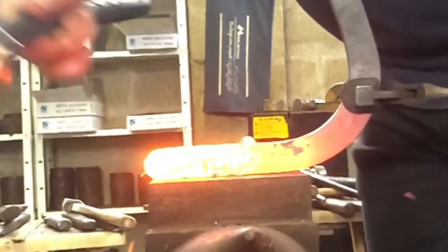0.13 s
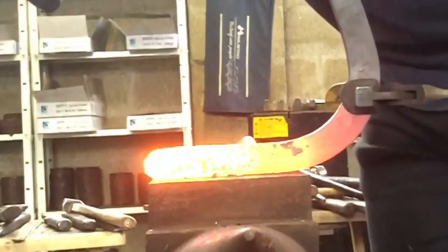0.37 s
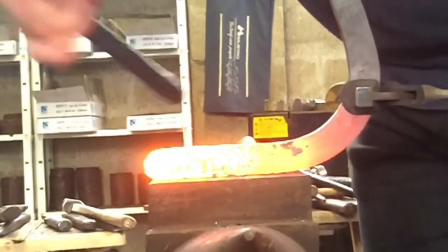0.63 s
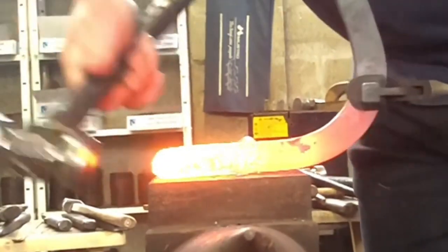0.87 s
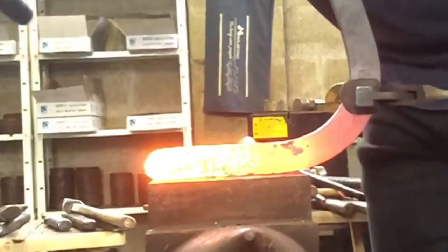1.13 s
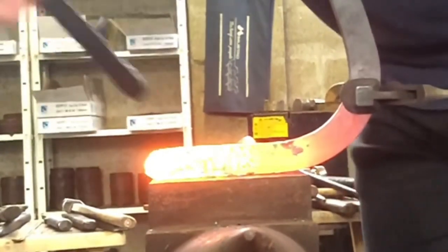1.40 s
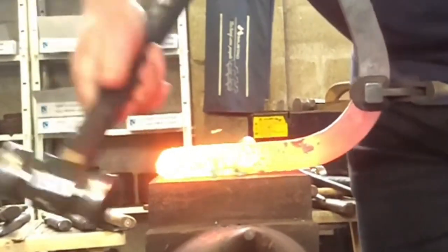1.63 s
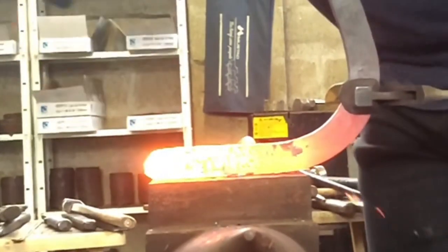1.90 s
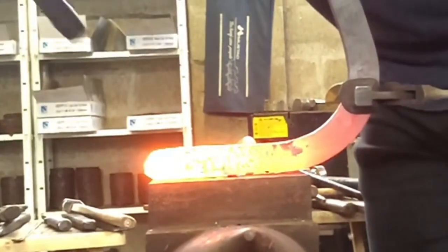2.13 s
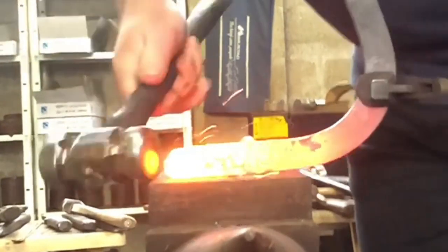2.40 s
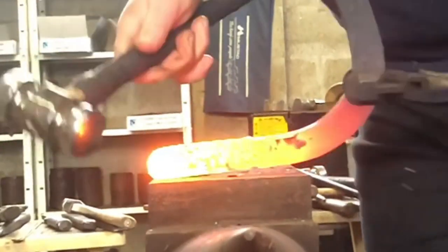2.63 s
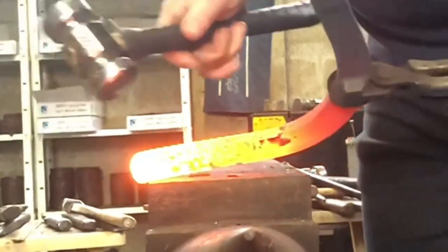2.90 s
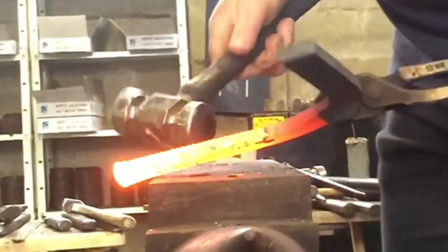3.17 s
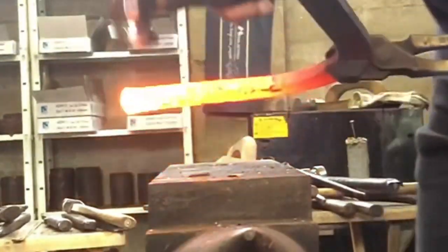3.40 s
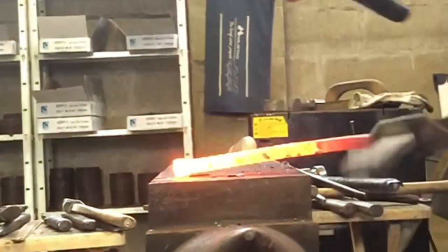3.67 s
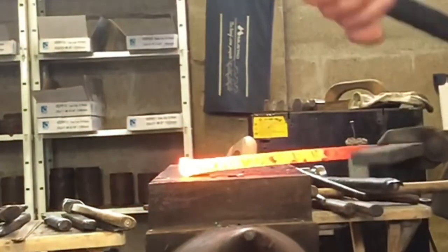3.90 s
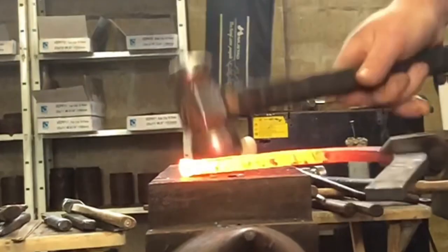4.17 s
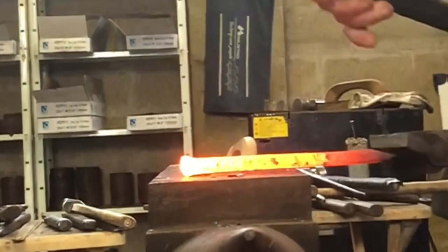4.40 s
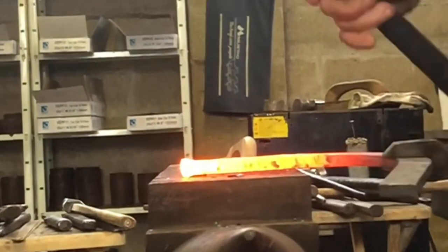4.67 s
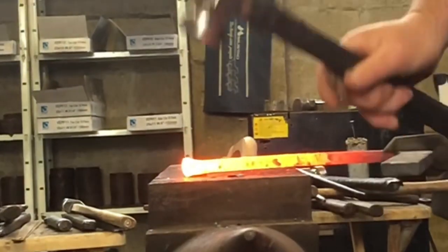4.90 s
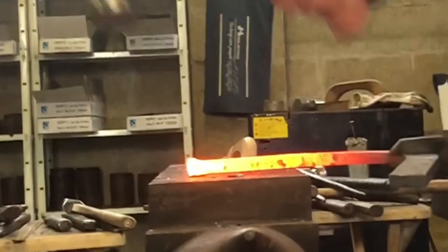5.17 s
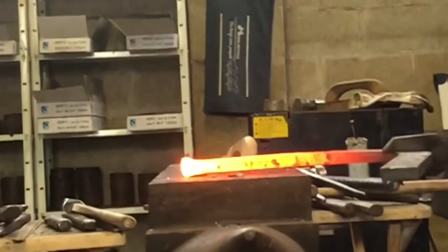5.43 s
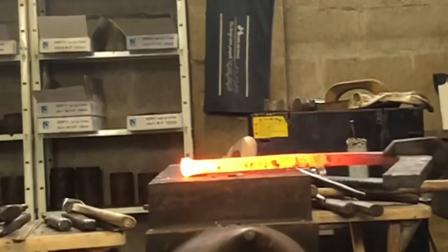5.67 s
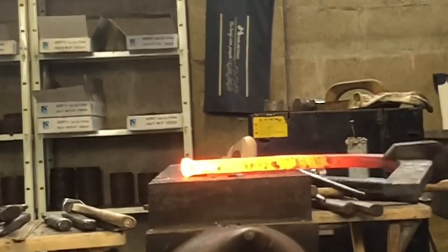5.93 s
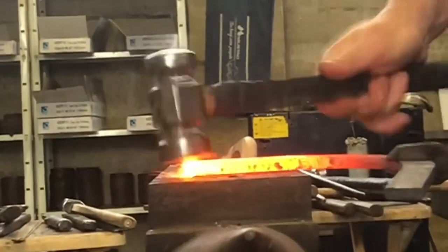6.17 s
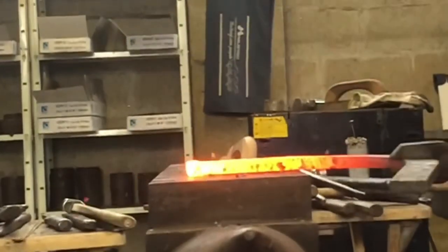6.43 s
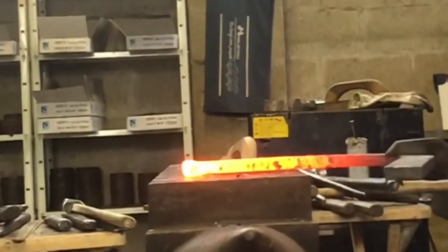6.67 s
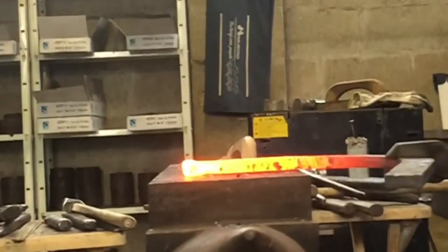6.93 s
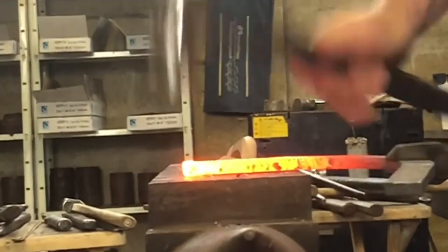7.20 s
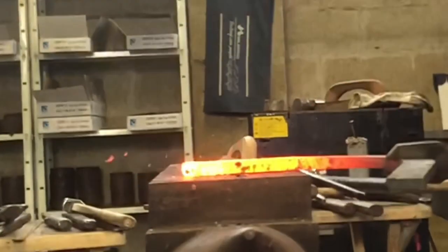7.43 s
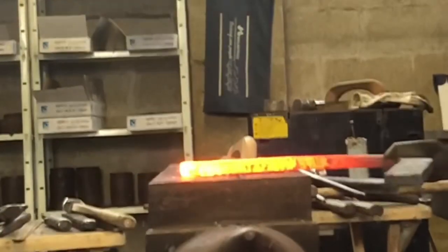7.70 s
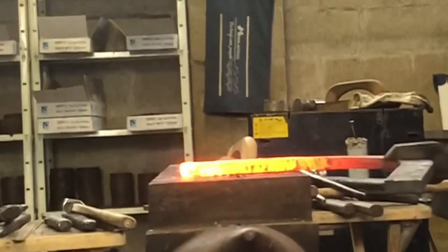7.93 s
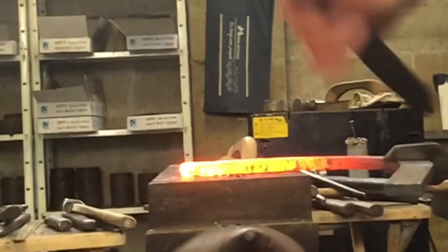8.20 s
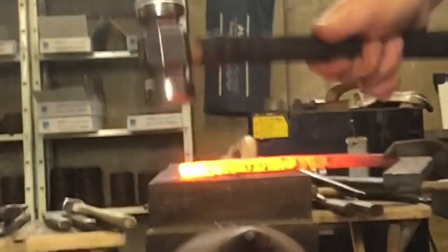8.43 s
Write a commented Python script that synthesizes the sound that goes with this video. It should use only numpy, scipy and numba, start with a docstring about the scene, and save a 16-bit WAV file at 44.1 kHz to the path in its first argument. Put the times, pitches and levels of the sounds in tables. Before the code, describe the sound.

Ten spaced hammer blows clang on glowing metal and an anvil, with a brief scrape between them, room echo and a steady forge rumble.

```python
"""A forge roars throughout as a hammer strikes a hot steel bar on an anvil, in a block-walled workshop.
Five sums of modes and resonant noise bands answer ten blows: crack, hammer, anvil, stand and room; four are end-on.
From 2.7 s bar and tongs slide as speed-driven friction noise; from 3.2 s the blows fall flat on the middle,
with a dry scuff at 3.75 s as the bar is laid down, and from 6.3 s they fall flat on the tip.
Flakes of scale and small clinks tick between blows as decaying noise; at each strong peak the level is limited."""
import sys
import numpy as np
from scipy import signal
from scipy.fft import rfft, irfft, next_fast_len
from scipy.io import wavfile
from scipy.ndimage import uniform_filter1d, minimum_filter1d
from numba import njit

SR = 44100
rng = np.random.default_rng(int(sys.argv[2]) if len(sys.argv) > 2 else 0)


def elevation(decibels):
    """Turn decibel levels (scalar or array-like) into linear amplitude ratios."""
    levels = np.asarray(decibels, float)
    return 10 ** (levels / 20)


def to_wav(sig):
    """Store sig (one row per channel, or 1-D mono) as 16-bit WAV at the path in sys.argv[1].

    Samples outside -1..1 are clipped; the rate is SR.
    """
    pcm = np.clip(np.atleast_2d(sig), -1, 1) * 32767
    pcm = np.round(pcm).astype(np.int16)
    wavfile.write(sys.argv[1], SR, pcm.T)  # frames by channels


N = 377937  # samples

# Levels and colours are relative; "end-on", "middle" and "tip" say where the bar is struck.
# Hammer blows: (time [s], crack [dB], ring [dB], room [dB], dullness [dB per octave])
BLOW_LIST = [(0.058, -8, -32.5, -29.5, -5.5), (.866, -5.5, -32.5, -29.5, 4.5),
             (1.6675, -9.5, -35, -27.5, 1), (2.4959, -10, -38.5, -28.5, -2.5),
             (3.2316, -13.5, -40.5, -35.5, 39), (4.3045, -3, -27, -28, 7.5),
             (5.158, -3, -23.5, -25.5, -1.7), (6.3035, -20, -40, -29, 17), (7.367, -3, -34, -26, 5),
             (8.4039, 3.5, -31.5, -24, 1)]
# Place struck by each blow: (0 end-on, 1 flat on the stiff middle, 2 flat on the soft hot tip)
STRUCK_PLACE = [0, 0, 0, 0, 1, 1, 1, 2, 2, 2]
# Clank of the contact: (frequency [Hz], width [Hz], end-on [dB], middle [dB], tip [dB])
CRACK_BANDS = [(294, 120, -21, -18.5, -18.5), (754, 800, -15.5, -9.5, -15), (1850, 1400, -14, 0, -5),
               (3350, 1500, 2, -11, 3), (4500, 4500, -14, -22, -2.5), (5900, 460, -5.5, -12, -8),
               (7820, 2000, -0.5, -7.5, -0.5)]
# Modes of the anvil: (frequency [Hz])
ANVIL_MODE_HZ = [1497, 2331, 2376, 2735, 3112, 3655, 4315, 4710, 5098, 5521, 5526, 6045, 6213, 6660, 6794,
                 7080, 7110, 7178, 7477, 7577, 7721, 7838, 8242, 8349, 8468, 8721, 8815, 8850]
# For each of them: (t60 [s], end-on [dB], middle [dB], tip [dB])
ANVIL_MODES = [(1.3, -31.5, -18.5, -15), (1.1, -26.5, -21.5, -15.5), (1.05, -4, -0.5, -1.5),
               (0.52, -9, -19.5, -9), (0.32, -9, -33.5, -7.5), (0.89, -12.5, -19.5, -15),
               (0.66, -9, -27, -12.5), (0.23, -27, -27, -23.5), (0.5, -14.5, -19, -12),
               (1.294, -27.5, -12, -16.5), (0.84, -17.5, -20.5, -29), (0.29, -12, -24, -27.5),
               (.6, -15.5, -21.5, -19.5), (0.3, -5, -34, -23), (0.74, -6, -33.5, -14.5),
               (0.36, -7.5, -26, -33), (0.61, -1, -26, -14.5), (0.41, -26.5, -20.5, -15),
               (0.43, -9.5, -34.5, -35), (0.29, 1, -11.5, -9), (0.3, -8, -36, -34), (0.54, -11, -22.5, -14),
               (0.29, -23.5, -6, -19.5), (0.43, -16, -25, -29.5), (.12, -10.5, -38.5, -36),
               (0.11, -4.5, -17, -28), (0.48, -20, -17.5, -9), (.45, -31, -20.5, -17.5)]
# Low modes of horn and stand: (frequency [Hz])
STAND_MODE_HZ = [41, 607.9, 688, 775]
# For each of them: (t60 [s], end-on [dB], middle [dB], tip [dB])
STAND_MODES = [(.4, -15.5, -16, -11.5), (1.2, -13.5, -11.5, -9.5), (0.45, -33, -18, -22),
               (0.96, -22, -17.5, -26.5)]
# Modes of the hammer head, soon damped by the hand: (frequency [Hz])
HAMMER_MODE_HZ = [800, 2095, 3053, 3620, 6213]
# For each of them: (t60 [s], end-on [dB], middle [dB], tip [dB])
HAMMER_MODES = [(0.066, -31, -12, -6), (0.062, -23, -8.5, -51), (0.19, -16.5, -12, -20),
                (.08, -24, -24, -18), (0.07, -23, -9.5, -11)]
# Dull thud of bar and block: (frequency [Hz], width [Hz], t60 [s], end-on [dB], middle [dB], tip [dB])
THUD_BANDS = [(75.4, 61, 0.34, -18.5, -26.5, -20.5), (285, 90, 1.15, -20, -24, -15.5),
              (730, 170, 1.64, -24, -17.5, -14), (1145, 600, 1.61, -18, -14.5, -19.5),
              (1850, 1300, 1.3, -29, -10.5, -21.5)]
# Colour of the room sound: (frequency [Hz], density [dB per Hz])
ROOM_COLOUR = [(60, -19.5), (150, -23.5), (280, -24.5), (450, -22.5), (730, -15), (1100, -23),
               (2500, -21.5), (4500, -25.5), (7500, -28.5), (9300, -31)]
# Decay of the room: (frequency [Hz], t60 [s])
ROOM_DECAY = [(60, 0.69), (250, 1.4), (1000, 1.15), (2500, 1.27), (5000, 0.71), (9000, 0.48)]
# Room level above 3.5 kHz: (end-on [dB], middle [dB], tip [dB])
ROOM_TREBLE = [1.5, -8, -0.5]
# Bar and tongs sliding over the anvil face: (start [s], length [s], fastest [dB], share until fastest [1])
SLIDE_LIST = [(2.719, 0.46, -49, 0.5), (3.188, 0.15, -46, 0.37), (3.7, 0.32, -51.5, 0.53),
              (3.846, 0.52, -39.5, 0.55)]
# Colour of the sliding: (frequency [Hz], level [dB])
SLIDE_COLOUR = [(200, -11.5), (450, -13.5), (750, 1), (1100, -7.5), (1950, 0), (3200, -6), (4300, -10.5),
                (4900, -19), (8300, -18), (9300, -27)]
# Colour of the bar being laid down: (frequency [Hz], level [dB])
SCUFF_COLOUR = [(200, -10), (600, -5), (1100, -8.5), (1850, 1.5), (2400, 3), (3100, 1), (4500, -7.5),
                (6500, -4.5), (9300, -13)]
# Flakes of scale and small clinks: (time [s], level [dB])
TICK_LIST = [(.535, -57), (0.675, -58), (1.59, -66.5), (3.074, -53), (5.625, -51.5), (5.969, -58.5),
             (6.867, -57.5), (6.96, -65.5), (7.972, -52.5), (8.24, -62)]
# Colour of the forge roar: (frequency [Hz], level [dB])
FORGE_COLOUR = [(20, -34), (30, -6), (80, 9.5), (150, -7), (300, -7.5), (450, -13), (760, -6), (1000, -16),
                (3000, -18.5), (4800, -26), (6000, -29.5), (9300, -34.5)]
# Blurred low tones of the forge: (frequency [Hz], width [Hz], level [dB])
FORGE_TONE_BANDS = [(81, 14, -68.5), (93.5, 15, -61.5), (125.2, 11, -68.5), (192, 13, -68),
                    (320.5, 9.8, -69), (489, 11, -72)]

CONTACT_S = 0.0077  # t60 of the build-up of a contact
CRACK_T60_S, CRACK_TILT = 0.063, 1.3  # at 2 kHz; how much more the crack follows the brightness
EARLY_DB, EARLY_T60_S = 1.5, 0.075  # heard before the walls answer
ECHO_S, SWELL_S = 0.022, 0.032  # delay of the walls' answer, t60 of its build-up
RING_SCATTER_DB, RING_WAVER_DB = -1.2, 1.77
RING_SWELL_S, RING_SWELL_SHARE = 0.26, 0.28  # build-up of narrow lines: at most, share of their t60
RING_EARLY_DB, RING_EARLY_T60_S = 0, 0.33  # the anvil heard directly; t60 at most
EARLY_DULLS = 0.1  # loss of direct ring [dB] for each unit of dullness
ROOM_DULLS = 0.016  # tilt of the room sound [dB per octave] for each unit of dullness
STAND_DB, STAND_FOLLOWS, USUAL_ROOM_DB = -29, 0.16, -25  # the stand follows the force only a little
HORN_HZ, HORN_T60_S, HORN_BLOOM_S, HORN_DB = 611, 1.246, 0.74, 7  # the level adds to the stand's
HORN_PHASE = 3.43  # radians at the blow; the note beats with the stand's neighbouring note
RATTLE_DB, RATTLE_T60_S = 3.5, 1.2
SPEED_POWER, GRIT_DB, SNAG_DB = 0.95, 1.5, 0.7  # level follows speed; fine grit, coarser snags
LAY_S, LAY_DB, LAY_RISE_S, LAY_T60_S = 3.7545, -14, 0.036, 0.06  # rise and decay as t60
LAY_TAIL_DB, LAY_TAIL_T60_S = -45, 0.63
TICK_T60_S, TICK_TAIL_DB, TICK_TAIL_T60_S = 0.039, -10.5, 0.24
FORGE_DB = -56
LIMIT_DB, HOLD_S, RELEASE_S = -13, 0.014, 0.0067
TOP_HZ = 9007


def blows():
    """Superposition: each impact excites contact, hammer, anvil, stand, horn and room together."""
    times, crack_db, ring_db, room_db, dullness = np.transpose(BLOW_LIST)
    stand_db = STAND_DB + STAND_FOLLOWS * (room_db - USUAL_ROOM_DB)
    bright = -ROOM_DULLS * dullness
    out = crack(times, crack_db, dullness, bright)
    out += hammer(times, crack_db, dullness)
    out += anvil(times, ring_db, dullness)
    out += rings(STAND_MODE_HZ, STAND_MODES, answered, times, stand_db)
    out += horn(times, stand_db)
    tail = thud(times, room_db) + room(times, room_db, bright)
    # loose tools and separate echoes make the start of the tail clumpy
    clumps = RATTLE_DB * walk(130) * decays(times, 0.92, RATTLE_T60_S).real
    return out + tail * elevation(clumps)


def crack(times, crack_db, dullness, bright):
    """Impact noise: a brief contact excites broad bands, and the higher ones decay sooner."""
    out = 0
    for hz, width, *place_db in CRACK_BANDS:
        tilt_db = CRACK_TILT * bright * np.log2(hz / 2000)
        loss_db = 0.13 * dullness * max(np.log2(hz / 3200), 0)
        size = elevation(crack_db + np.take(place_db, STRUCK_PLACE) + tilt_db - loss_db)
        # the crack rises over a few milliseconds, then falls
        rise = decays(times, size, CONTACT_S)
        fall = decays(times, size, CRACK_T60_S * (2000 / hz) ** 0.42)
        out += band(hz, width) * (fall - rise).real / 2
    return out


def hammer(times, crack_db, dullness):
    """Strong damping: the modes of the hammer head are heard at once and soon stopped by the hand."""
    return rings(HAMMER_MODE_HZ, HAMMER_MODES, swelled, times, crack_db, 3 * dullness) / 2


def anvil(times, ring_db, dullness):
    """Modal vibration: lines sound directly, then build up in the room, the narrow ones more slowly."""
    def bloom(times, sizes, t60, hz):
        """Resonant build-up: the swell takes a share of the decay time, up to a limit."""
        swell = min(RING_SWELL_S, t60 * RING_SWELL_SHARE)
        early_db = RING_EARLY_DB - EARLY_DULLS * dullness
        return answered(times, sizes, t60, hz, swell, early_db, min(RING_EARLY_T60_S, t60))

    return rings(ANVIL_MODE_HZ, ANVIL_MODES, bloom, times, ring_db, dullness)


def horn(times, stand_db):
    """Energy storage: the horn's note keeps feeding the room, so it blooms late and fades evenly."""
    size = elevation(stand_db + HORN_DB) * np.exp(1j * HORN_PHASE)
    return swelled(times, size, HORN_T60_S, HORN_HZ, HORN_BLOOM_S).imag


def thud(times, room_db):
    """Damped resonance: bar and block sound as low noise bands that swell with the room."""
    out = 0
    for hz, width, t60, *place_db in THUD_BANDS:
        size = elevation(room_db + np.take(place_db, STRUCK_PLACE))
        out += band(hz, width) * answered(times, size, t60).real * 2
    return out


def room(times, room_db, bright):
    """Reverberation: the diffuse field is a set of noise bands, each with its own decay time."""
    out = 0
    for hz in 60 * 2 ** np.arange(0, 7.3, 0.4):
        size = elevation(room_db + bright * np.log2(hz / 2000) + table(ROOM_COLOUR, hz))
        size *= np.sqrt(hz / 300)  # bands widen with frequency
        size *= elevation(np.take(ROOM_TREBLE, STRUCK_PLACE) * (hz > 3500))
        out += band(hz, hz / 3) * answered(times, size, table(ROOM_DECAY, hz)).real
    return out


def drag():
    """Friction: rough steel on steel gives a gritty hiss that follows the speed of each slide."""
    t, speed = np.arange(N) / SR, 0
    for start, length, db, fastest in SLIDE_LIST:
        # bend time so that the sine peaks at the fastest moment
        bend = np.log(0.5) / np.log(np.clip(fastest, 0.1, 0.9))
        along = np.clip((t - start) / length, 0, 1) ** bend
        speed = speed + elevation(db) * np.abs(np.sin(np.pi * along)) ** SPEED_POWER
    grit = elevation(GRIT_DB * walk(400) + SNAG_DB * walk(45))
    return noise(lambda f: elevation(table(SLIDE_COLOUR, f))) * grit * speed


def lay_down():
    """Friction and reverberation: a short scuff of steel on steel and its tail in the room."""
    times = np.array([LAY_S])
    scuff = elevation(LAY_DB) * swelled(times, 1, LAY_T60_S, rise=LAY_RISE_S)
    tail = decays(times, elevation(LAY_TAIL_DB), LAY_TAIL_T60_S)
    return noise(lambda f: elevation(table(SCUFF_COLOUR, f))) * (scuff + tail).real


def ticks():
    """Impulse response: brittle clicks excite two treble bands and leave a short tail."""
    times, db = np.transpose(TICK_LIST)
    colour = band(3300, 1800) + 0.84 * band(7200, 2500)
    click = decays(times, elevation(db), TICK_T60_S)
    tail = decays(times, elevation(db + TICK_TAIL_DB), TICK_TAIL_T60_S)
    return colour * (click + tail).real


def forge():
    """Filtered noise: a broad roar with blurred low tones and a faint, flickering treble hiss."""
    roar = noise(lambda f: elevation(table(FORGE_COLOUR, f))) * elevation(FORGE_DB + walk(3))
    hiss = band(12000, 5000) * elevation(-74 + 3 * walk(27))
    tones = sum(elevation(db) * band(hz, width) for hz, width, db in FORGE_TONE_BANDS)
    return roar + hiss + tones


def rings(hz_list, modes, shape, times, level_db, dullness=0):
    """Modal superposition: every blow excites all modes, neighbours in opposite phase; echoes flutter them."""
    scatter = rng.standard_normal((len(times), len(modes))).T
    waver = [elevation(RING_WAVER_DB * (walk(20) + walk(70))) for _ in range(4)]
    out = 0
    for k, (hz, (t60, *place_db)) in enumerate(zip(hz_list, modes)):
        loss_db = dullness * max(np.log2(hz / 5600), 0)
        db = level_db + np.take(place_db, STRUCK_PLACE) - loss_db + RING_SCATTER_DB * scatter[k]
        out = out + (-1) ** k * waver[k % 4] * shape(times, elevation(db), t60, hz).imag
    return 2 * out


def answered(times, sizes, t60, hz=0, swell=SWELL_S, early_db=EARLY_DB, early_t60=EARLY_T60_S):
    """Direct and reflected sound: an early part, then a swell once the walls have answered."""
    direct = swelled(times, sizes * elevation(early_db), early_t60, hz)
    return direct + swelled(times, sizes, t60, hz, swell, ECHO_S)


def swelled(times, sizes, t60, hz=0, rise=CONTACT_S, late=0):
    """Build-up and decay: the difference of two exponentials starts from nothing."""
    return decays(times, sizes, t60, hz, late) - decays(times, sizes, rise, hz, late)


def decays(times, sizes, t60, hz=0, late=0):
    """Exponential decay: a jump late s after each time falls 60 dB in t60 s, turning at hz since that time."""
    kicks, wait = np.zeros(N, complex), int(late * SR)
    kicks[(times * SR).astype(int) + wait] = sizes * np.exp(2j * np.pi * hz * wait / SR)
    pole = np.exp((2j * np.pi * hz - np.log(1000) / t60) / SR)
    return signal.lfilter([1], [1, -pole], kicks)


def band(hz, width):
    """Resonance: noise shaped by one peak."""
    return noise(lambda f: 1 / (1 + ((f - hz) * 2 / width) ** 2))


def noise(gain):
    """Spectral shaping: white noise takes the gain(Hz) colour, at rms 1."""
    size = next_fast_len(N)
    hz = np.arange(size // 2 + 1) * SR / size
    x = irfft(rfft(rng.standard_normal(size)) * gain(hz), size)[:N]
    return x / np.std(x)


def walk(rate):
    """Random modulation: levels held 1 / rate s and smoothed twice; spread near 1."""
    k = int(SR / rate)
    held = np.repeat(rng.standard_normal(N // k + 1), k)
    return 1.3 * uniform_filter1d(uniform_filter1d(held, k), k)[:N]


def table(points, hz):
    """Interpolation: straight lines between (Hz, value) points on a log-frequency axis."""
    f, v = np.transpose(points)
    return np.interp(np.log(np.maximum(hz, 1)), np.log(f), v)


def scene():
    """Superposition of all sources in one channel."""
    return (blows() + drag() + lay_down() + ticks() + forge())[None]


@njit
def release(gain, step):
    """Gain control: the gain drops at once and climbs back smoothly."""
    out, g = np.empty(len(gain)), 1.
    for i in range(len(gain)):
        g = min(gain[i], g + step * (gain[i] - g))
        out[i] = g
    return out


def band_limit(x):
    """A steep low-pass at the top of the band."""
    return signal.sosfilt(signal.butter(12, 9880, fs=SR, output="sos"), x)


def record(dry):
    """Peak limiting and low-pass filtering: the gain is held before release, then the top is cut steeply."""
    need = np.minimum(1, elevation(LIMIT_DB) / (np.abs(dry[0]) + 1e-9))
    hold = int(HOLD_S * SR)
    held = minimum_filter1d(need, size=hold, origin=(hold - 1) // 2)
    limited = dry * release(held, 1 / (RELEASE_S * SR))
    low_pass = signal.ellip(8, 0.3, 60, TOP_HZ, fs=SR, output="sos")
    return band_limit(signal.sosfilt(low_pass, limited))


dry = scene()
out = record(dry)
to_wav(out)
```